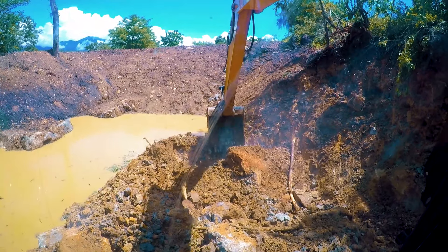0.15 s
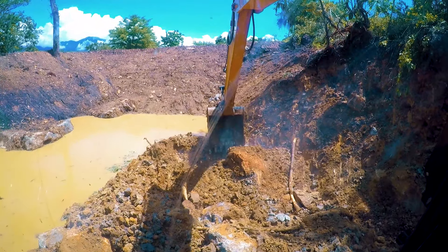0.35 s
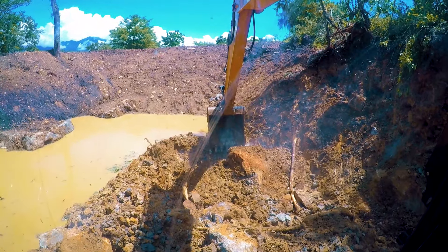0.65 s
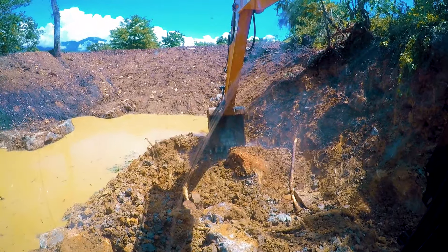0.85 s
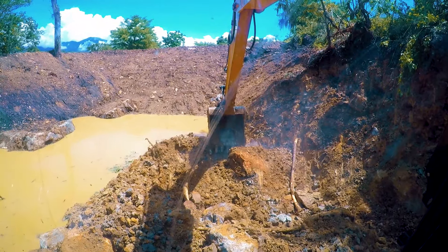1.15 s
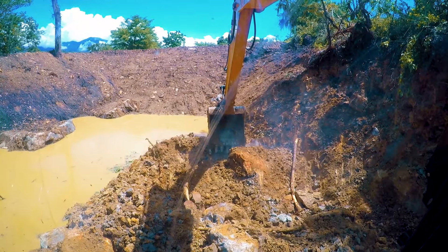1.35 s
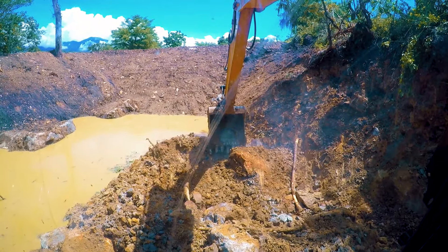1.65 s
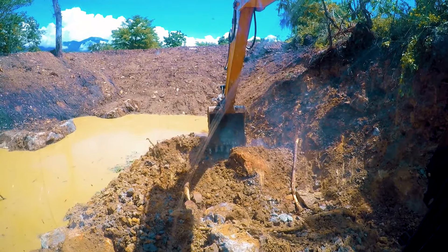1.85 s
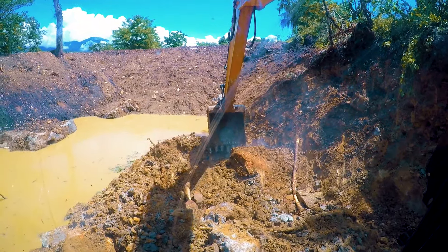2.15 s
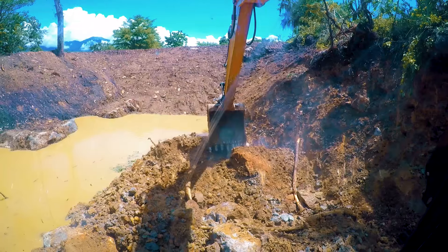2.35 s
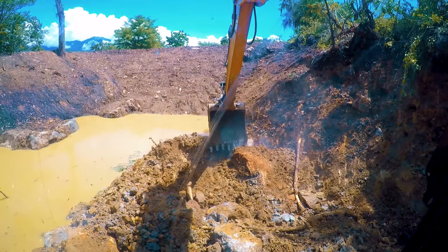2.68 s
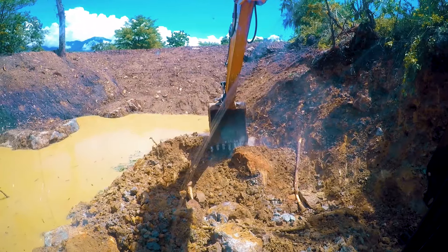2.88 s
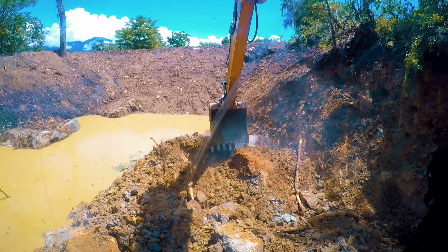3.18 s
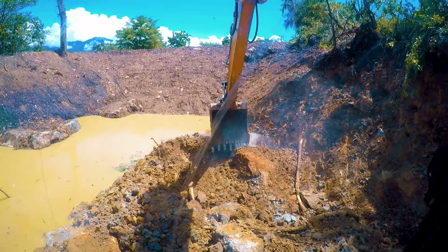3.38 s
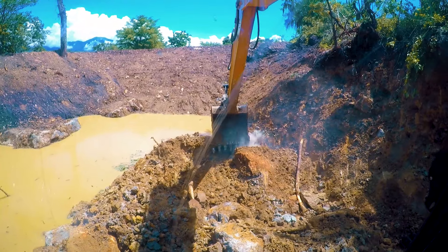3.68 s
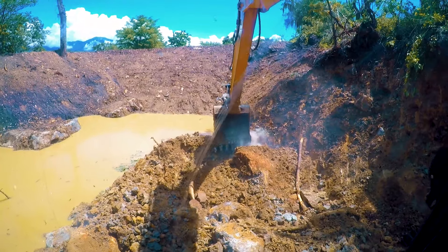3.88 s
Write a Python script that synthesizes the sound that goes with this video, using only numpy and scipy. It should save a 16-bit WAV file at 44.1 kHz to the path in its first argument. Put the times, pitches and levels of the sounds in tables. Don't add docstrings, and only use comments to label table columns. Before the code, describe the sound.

A small camera fixed to a digger's cab picks up close engine rumble, panel boom and pump whine through the frame. Stones snap brightly in the first third of a second, followed by irregular thuds, gritty grinding and occasional pebbles clicking. After three and a half seconds, two hard blows ring the bucket, the second strongest, while rubble cracks and pours. Open-air, dry, wide stereo with faint crackly ticks.

```python
import sys
import numpy as np
from scipy import signal
from scipy.fft import rfft, irfft, next_fast_len
from scipy.io import wavfile
from scipy.ndimage import uniform_filter1d, map_coordinates

SR = 44100
rng = np.random.default_rng(int(sys.argv[2]) if len(sys.argv) > 2 else 0)


def dump_mix(stems):
    frames = np.atleast_2d(stems).T
    limited = np.clip(frames, -1, 1)
    pcm = np.round(limited * 32767).astype(np.int16)
    wavfile.write(sys.argv[1], SR, pcm)


def makeup_ratio(level_db):
    decades = np.asarray(level_db, float) / 20
    return 10 ** decades


N = 177546
T = np.arange(N) / SR

# start_s, level_db, ring_centre_hz, t60_s
THUDS = [(.3, -36, 943, 0.2), (.318, -31.5, 1300, 0.097), (1.102, -24, 181.5, 0.13),
         (1.257, -44, 1095, 0.042), (1.93, -47.5, 906, 0.037), (2.189, -35, 1390, 0.072),
         (2.25, -30, 903, 0.085), (2.289, -31, 191, 0.074), (2.699, -33.5, 1410, 0.065),
         (2.791, -24.5, 249, 0.12), (3.042, -44, 448, 0.13), (3.075, -30, 455, 0.22),
         (3.101, -33.5, 270, 0.2), (3.458, -43.5, 1400, 0.4), (3.61, -12.5, 131.5, 0.1),
         (3.623, -30, 1320, 0.13), (3.677, -21, 328, 0.1), (3.711, -19.5, 278, 0.11),
         (3.814, -21.5, 324, .1), (3.681, -25.5, 1250, 0.14), (3.778, -13, 76, 0.36),
         (3.903, -34, 1280, 0.032)]
# start_s, level_db, ring_centre_hz, t60_s
BOULDER = [
    (3.596, -25, 240, .1),
    (3.612, -21, 300, .15),
    (3.632, -25, 400, .08),
    (3.735, -24, 1440, .09),
    (3.776, -8, 345, .09),
    (3.772, -21, 930, .1),
    (3.77, -20, 1400, .08),
    (3.785, -5, 165, .1),
]
# start_s, level_db, ring_centre_hz, t60_s
KNOCKS = [(.01, -26, 189.4, .12), (0.261, -36, 470, .1), (1.46, -41.5, 676, 0.11), (1.58, -25, 135, .15),
          (2.141, -27, 165, 0.2), (2.72, -30.5, 191, 0.13), (2.901, -30, 180.5, 0.19),
          (2.98, -22.5, 143.4, .15), (3.26, -28, 167, .15), (2.21, -31, 752, 0.13),
          (2.253, -42.5, 1410, 0.075), (2.71, -41, 805, 0.12), (2.82, -25, 187, 0.21),
          (3.06, -38, 1150, .15), (3.15, -26, 185, 0.22), (3.7, -28, 753, 0.11), (3.861, -22, 148, 0.2)]
# mode_hz, width_hz, level_db
ARM = [(76, 15, 0), (125, 20, -2), (150, 20, 0), (185, 20, -3), (235, 25, -3), (262, 25, -2), (300, 30, -4),
       (340, 30, -6), (455, 30, -6), (700, 50, -14), (880, 35, -10), (1150, 60, -19), (1270, 50, -18),
       (1440, 40, -14)]

# middle_s, length_s, level_db
JOLTS = [(.03, .08, -10), (.4, 0.078, -15), (1.15, .07, -11.5), (1.28, 0.13, -12), (1.47, 0.084, -17),
         (1.58, .06, -15.5), (1.9, .13, -10.5), (2.05, 0.068, -15), (2.26, 0.09, -11), (2.38, 0.06, -14.5),
         (2.66, 0.082, -11.5), (2.83, 0.094, -10), (3.06, 0.055, -13.5), (3.15, 0.079, -10.5),
         (3.32, .08, -17), (3.64, 0.08, -15.5), (3.78, .06, -14.5)]
# middle_s, length_s, level_db
LURCHES = [(.3, .14, -17.5), (.55, 0.18, -15), (.8, 0.064, -20.5), (1.15, 0.14, -16), (1.5, 0.077, -23),
           (1.72, 0.063, -16), (2.14, 0.072, -20.5), (2.5, 0.13, -17.5), (2.82, 0.052, -32),
           (3.15, 0.089, -32), (3.56, 0.36, -16), (3.9, .1, -33)]
# mode_hz, width_hz, level_db
CAB = [(76, 10, -11), (91.83, 9, -1), (102.03, 9, -1), (117.3, 8, -3.5), (129.4, 8, -8), (145, 9, -14.5)]
# freq_hz, density_db (per Hz)
SWAY = [(10, -39), (20, -5), (28, 4), (36, -1.5), (48, -22), (70, -11), (85, -33.5), (150, -120)]
BOOM_NOISE_DB = 1
SWELL_DB = 8.5
SWAY_REST_DB, DRAG_REST_DB, BOOM_REST_DB = -22, -47.5, -22

SHAFT_HZ = 29.33
# time_s, firing_db
LOAD = [(0, -29), (.25, -19.5), (.42, -31), (.7, -18), (.97, -12), (1.3, -28), (1.55, -16.5), (1.72, -14.5),
        (1.88, -17.5), (2.0, -20.5), (2.12, -16), (2.3, -26.5), (2.5, -22), (2.88, -23), (3.0, -17.5),
        (3.22, -26.5), (3.45, -18), (4.03, -33)]
# time_s, whine_db, brightness_db (per octave)
OIL_PRESSURE = [(0, -63, 1), (.3, -34, -0.5), (.65, -40, -0.5), (.8, -27.5, -2), (1.0, -26.5, -.5),
                (1.25, -27.5, 1), (1.55, -29.5, -0.5), (1.8, -29, .5), (2.2, -27.5, -1.5), (2.4, -44.5, 2),
                (2.55, -30.5, -1), (3, -31.5, -2), (3.25, -36.5, -5.5), (3.45, -51, 5), (4.03, -44.5, -2)]
PUMP_ORDERS = [9, 12, 27, 36, 45, 54, 63, 72, 81, 90]
# level_db, left_lead_rad, left_minus_right_db
PISTONS = [(-2.5, -2.9, -6), (-13, -1.1, 0), (-28, 2.1, -3), (-24.5, -.5, 1), (-28, 2.2, 0), (-25, 2.7, 0),
           (-39, .5, 0), (-43, 1, 0), (-44, 0, 0), (-51, 0, 0)]
# middle_s, length_s, level_db
VALVE = [
    (.45, 0.44, -67),
    (.8, .2, -69.5),
    (2.1, 0.35, -75),
]

# middle_s, length_s, drag_db
BITES = [(0, 0.12, -43), (0.384, 0.068, -51), (0.83, 0.27, -46), (1.118, 0.12, -39.5), (1.297, 0.11, -41.5),
         (1.574, 0.13, -45), (1.902, 0.19, -41), (2.258, 0.093, -38.5), (2.36, 0.097, -45),
         (2.655, 0.11, -43.5), (2.811, 0.094, -42), (3.054, 0.039, -42.5), (3.133, 0.082, -43),
         (3.534, 0.075, -39.5), (3.708, 0.15, -34), (3.787, 0.068, -29.5)]
# freq_hz, density_db (per Hz)
GROAN = [(120, -48), (160, 3.5), (182, -5), (225, -7), (290, -9.5), (350, -10), (400, -17), (520, -21.5),
         (620, -38.5), (900, -120)]
# freq_hz, density_db (per Hz)
SCRAPE = [(350, -120), (480, -6.5), (600, -0.5), (750, 6), (880, -8), (1000, 0), (1420, -3), (1600, -6.5),
          (1780, -17), (2600, -37.5), (5000, -120)]
GROAN_DB, GROAN_GROWS = -31, 0.76
# middle_s, length_s, level_db
GRINDS = [(1.93, 0.043, -44), (2.2, 0.026, -39.5), (2.26, 0.045, -39.5), (2.33, .04, -45),
          (2.56, 0.044, -46), (2.68, 0.079, -41), (2.82, .08, -42.5), (3.08, .07, -42), (3.17, .04, -49),
          (3.64, .05, -35.5), (3.7, .05, -31.5)]
# mode_hz, width_hz, level_db
LIP = [(706, 73, -3.5), (876, 76, -2), (1050, 120, -6), (1250, 77, -4.5), (1433, 60, -1)]

# start_s, crack_db, crunch_db
STONES = [(0.0545, -30, -36), (0.077, -48, -35), (0.15, -38.5, -33.5), (0.252, -43.5, -43),
          (0.273, -32.5, -35), (0.2754, -36, -39.5), (0.2863, -45, -40), (0.3, -44, -39.5),
          (0.314, -43.5, -39.5), (0.33, -55, -42.5), (.345, -60, -58), (0.5765, -37.5, -40),
          (0.5994, -44, -42.5), (1.098, -44, -49.5), (1.7491, -50.5, -50.5), (1.94, -46.5, -47),
          (2.265, -43.5, -44.5), (2.4888, -47, -42.5), (2.744, -38.5, -43), (2.967, -40, -45),
          (3.1412, -47, -45), (3.2755, -41.5, -44), (3.458, -58, -44.5), (3.511, -41, -43),
          (3.582, -43, -55), (3.592, -46, -34), (3.5985, -42.5, -33.5), (3.6608, -42, -43.5),
          (3.673, -48, -44.5), (3.7017, -48, -37.5), (3.7576, -27.5, -28.5), (3.7657, -33, -31),
          (3.8, -37.5, -45.5), (3.8445, -37.5, -43), (3.905, -45.5, -38.5), (3.9602, -35, -36),
          (4.003, -54, -36.5)]
# start_s, crack_db
PEBBLES = [(0.022, -36), (0.105, -48), (.4294, -52), (0.881, -44.5), (1.46, -50.5), (2.144, -47),
           (2.4313, -50), (2.547, -51.5), (2.67, -53), (2.8235, -56), (3.353, -51.5), (3.5707, -44.5),
           (3.649, -38.5), (3.9473, -37)]
# middle_s, length_s, over_rest_db
SPILLS = [
    (0.071, 0.15, 11.5),
    (3.7, 0.069, 18.5),
    (3.62, 0.034, 10.5),
    (3.84, 0.12, 18),
    (3.9, 0.034, 14.5),
]
# freq_hz, density_db (per Hz)
CRUNCH = [(200, -120), (350, 3.5), (800, 4.5), (1300, 1.5), (1750, -1.5), (2300, -2), (3100, -8.5),
          (3600, -8.5), (4800, -17), (6000, -34.5), (9000, -120)]
# freq_hz, density_db (per Hz)
CRACK = [(2500, -120), (4000, -13), (5200, -5.5), (6500, 1), (7400, 0.5), (8900, -12.5), (10500, -18),
         (11500, -28.5), (12500, -40.5), (16000, -66.5), (20000, -120)]
# freq_hz, density_db (per Hz)
SNAP = [(600, -120), (1200, -6.5), (3000, -5), (7000, 2), (10000, -6.5), (13500, -16), (15500, -30.5),
        (18000, -120)]
SNAP_DB, SNAP_T60_S = -7.5, 0.014
HOLD_S = 0.012
PEBBLE_CRUNCH_DB = -6
REBOUND_S, REBOUND_CRACK_DB, REBOUND_CRUNCH_DB = .022, -23.5, -12.5
HISS_DB, HISS_GROWS, RUSTLE_DB, RUSTLE_GROWS = -66, 0.74, -64, 0.8
SLIDE_S = 0.18
GRAIN_DB, GRAIN_BINS, GRAIN_FRAMES = 1.5, 3, 4
# start_s, end_s, pitch_hz, level_db
SQUEAKS = [
    (.34, .58, 5950, -67),
    (.42, .54, 8500, -78),
    (3.842, 3.885, 5350, -51),
    (3.6, 3.63, 2050, -45),
    (.076, .1, 2300, -45),
    (.074, .1, 3600, -48),
    (3.665, 3.69, 11900, -64),
    (1.93, 1.96, 2300, -61),
]
# start_s, level_db, t60_s
RINGS = [
    (3.76, -56, .3),
    (2.8, -72, 0.14),
    (3.5, -72, .15),
    (3.95, -60, 0.097),
]
# mode_hz, level_db
TOOTH = [(8250, -6), (8800, -5), (9300, -7), (9750, -2), (10300, -3), (10850, -7), (11500, -6)]

# freq_hz, likeness_0_to_1, left_lead_rad, left_minus_right_db
FRAME_PORTS = [(19.3, 0.4, 0.6, 2), (36.6, 0.1, 0.81, -5), (66.4, 0.8, 0.16, -15), (83.5, 1, 2.535, -1.5),
               (142.6, 0.95, 3.06, -4.5), (218.6, 0.79, 2.84, -4.5), (372, 0.07, 5.5, -0.5),
               (575, 0, 4.05, -3), (664, 0.65, 3.07, -2), (1560, 0.82, 2.8, 0), (1980, 1, 1.2, -4.5)]
# freq_hz, likeness_0_to_1, left_lead_rad, left_minus_right_db
ARM_PORTS = [(76, 0.2, 0.49, 4.5), (154, 1, 2.57, -7), (295, 0.72, 4.5, -3.5), (470, 0.98, 3.6, 4),
             (1510, 0.87, 2.87, -1)]
# freq_hz, likeness_0_to_1, left_lead_rad, left_minus_right_db
AIR_PORTS = [(400, 0.4, -3.5, -15), (1010, 0.2, 4, 0), (1700, 0, 0, 2), (2700, 0.8, 1.8, 0),
             (4330, 0.3, -0.85, -1), (5940, 0, 2.5, -1), (9350, 0.32, 4.5, -1), (13000, .5, 4.5, 1.5)]

BLOCKS_PER_S, BLOCK_START = 375, .2
# freq_hz, level_db
SEAM = [(1500, -28), (4000, -0.5), (7000, 6.5), (9000, 13), (11000, 3.5), (13000, 1), (15500, -6),
        (17000, -35)]
SEAM_DB, SEAM_GROWS = -59.5, 1.2
# start_s, level_db
TICKS = [(0.3533, -56), (.363, -61.5), (0.3818, -56), (.395, -59), (.8633, -60), (0.949, -54.5),
         (1.0766, -49.5), (1.2238, -60.5), (1.2579, -60.5), (1.2795, -56), (1.3537, -52), (1.3684, -55),
         (1.3744, -55.5), (1.511, -55.5), (1.573, -56.5), (1.731, -59), (1.7647, -56), (1.9891, -51),
         (2.0765, -51.5), (2.2586, -55), (2.3484, -56.5), (2.4382, -57.5), (2.6013, -56), (2.655, -55),
         (2.683, -59), (2.7166, -54.5), (2.8099, -58.5), (2.8336, -52), (3.037, -64), (3.0955, -56)]
TICK_DB = -7.5
# freq_hz, density_db (per Hz)
MIC_HISS = [(6000, -120), (9000, -4), (11000, 1), (12800, -1.5), (13200, -24.5), (15500, -33.5),
            (17000, -120)]
MIC_HISS_DB = -88.5


def unit(x):
    return x / np.sqrt(np.mean(x ** 2) + 1e-20)


def along(points, hz):
    f, *cols = np.transpose(points)
    return [np.interp(np.log(hz + 1), np.log(f + 1), c) for c in cols]


def curves(rows):
    s, *cols = np.transpose(rows)
    return [np.interp(T, s, c) for c in cols]


def wobble(rate):
    return map_coordinates(rng.standard_normal(int(N * rate / SR) + 4), [T * rate])


def two_wobbles(rate):
    return np.array([wobble(rate), wobble(rate)])


def filtered(x, response):
    m = next_fast_len(N + SR // 2)
    return irfft(rfft(x, m) * response(np.fft.rfftfreq(m, 1 / SR)), m)[..., :N]


def modes(table):
    def response(f):
        total = 0
        for k, (centre, width, db) in enumerate(table):
            damping = 1j * f * width
            total = total + (-1) ** k * makeup_ratio(db) * damping / (centre * centre - f * f + damping)
        return total
    return response


def rush(spectrum):
    return unit(filtered(rng.standard_normal((2, N)), lambda hz: makeup_ratio(along(spectrum, hz)[0])))


def steadied(x, span, share):
    power = np.abs(uniform_filter1d(x ** 2, int(span * SR), axis=-1)) + 0.0009
    return unit(x / power ** (share / 2))


def swells(rows, rest_db):
    power = makeup_ratio(2 * rest_db)
    for s, span, db in rows:
        fall_db = SWELL_DB * np.minimum(((T - s) / span) ** 2, 9)
        power = power + makeup_ratio(2 * (db - fall_db))
    return 10 * np.log10(power)


def bursts(rows, rise, hold=0):
    age = np.arange(SR // 2) / SR
    power = np.zeros(N + SR)
    for s, db, t60 in rows:
        decay_db = 60 * np.maximum(age - hold, 0) / np.clip(t60, .005, .33)
        burst = makeup_ratio(db - decay_db) * (1 - np.exp(-age / rise))
        power[round(s * SR):][:len(age)] += burst ** 2
    return np.sqrt(power[:N])


def ports(pair, table):
    def side(sign):
        def response(hz):
            alike, lead, db = along(table, hz)
            turn = np.arccos(np.clip(alike, 0, 1)) / 2
            shift = makeup_ratio(sign * db / 2) * np.exp(.5j * sign * lead)
            return shift * [np.cos(turn), sign * np.sin(turn)]
        return filtered(pair, response).sum(axis=0)
    return np.array([side(0.97), side(-0.94)])


def thuds():
    out = np.zeros((2, N + SR))
    age = np.arange(SR // 3) / SR
    hz = np.array(ARM)[:, :1]
    for s, db, centre_hz, t60 in THUDS + BOULDER + KNOCKS:
        near_db = -24 * np.log2(hz / centre_hz) ** 2 + rng.normal(0, 1.5, (2, len(ARM), 1))
        phase = rng.random((2, len(ARM), 1))
        rings = makeup_ratio(near_db) * np.sin(2 * np.pi * (hz * age + phase))
        envelope = makeup_ratio(db - 60 * age / t60) * (1 - np.exp(-age / 0.0021))
        out[:, round(s * SR):][:, :len(age)] += envelope * rings.sum(axis=1)
    return out[:, :N]


def cab():
    sway_db = swells(LURCHES, SWAY_REST_DB)
    boom_db = swells(JOLTS, BOOM_REST_DB)
    sway = steadied(rush(SWAY), span=0.18, share=0.94)
    rattle = unit(filtered(rng.standard_normal((2, N)), lambda hz: modes(CAB)(hz) ** 2))
    rattle = steadied(rattle, span=0.036, share=0.77)
    boom = unit(panels() + makeup_ratio(BOOM_NOISE_DB) * rattle)
    return makeup_ratio(sway_db) * sway + makeup_ratio(boom_db) * boom


def panels():
    hum = np.zeros((2, N))
    for hz, width, db in CAB:
        level = makeup_ratio(db + 1.6 * two_wobbles(width))
        hum += level * np.sin(2 * np.pi * hz * T + 1.5 * two_wobbles(width))
    return unit(hum)


def engine():
    turns = 2 * np.pi * np.cumsum(SHAFT_HZ * (1 + .002 * wobble(2))) / SR
    sides = np.array([[.5], [-.5]])
    firing_level = makeup_ratio(curves(LOAD)[0] + 0.5 + 1 * sides)
    firing = firing_level * np.sin(2 * turns + 0.75 * sides + .5 * wobble(4.84))
    oil_db, bright_db = curves(OIL_PRESSURE)
    whine = np.zeros((2, N))
    for k, (db, lead, lr_db) in zip(PUMP_ORDERS, PISTONS):
        level_db = db + bright_db * np.log2(k / 9) + lr_db * sides + 9 / k ** .7 * wobble(7)
        waver = (8 / k + .015 * np.sqrt(k)) * wobble(10)
        whine += makeup_ratio(level_db) * np.sin(k * turns + lead * sides + waver)
    valve = makeup_ratio(swells(VALVE, -80) + 1.5 * wobble(8)) * np.sin(45 * turns + .4 * wobble(10))
    return firing + makeup_ratio(oil_db) * whine + valve


def drag():
    return swells(BITES, DRAG_REST_DB) - DRAG_REST_DB


def digging():
    groan_db = GROAN_DB + GROAN_GROWS * drag()
    scrape_db = DRAG_REST_DB + drag()
    slips = 2 * wobble(24.815) + 1.7 * wobble(70)
    groan = makeup_ratio(groan_db - 3.5 + 0.55 * slips) * steadied(rush(GROAN), span=0.072, share=0.21)
    steel = unit(filtered(rush(SCRAPE), lambda hz: 1 + 5 * modes(ARM)(hz)))
    return groan + makeup_ratio(scrape_db - 3.5 + slips) * steel


def grinds():
    rub = unit(filtered(rng.standard_normal((2, N)), modes(LIP)))
    return makeup_ratio(swells(GRINDS, -69) + 2.7 * wobble(60)) * rub


def stones():
    slide_db = uniform_filter1d(drag(), int(SLIDE_S * SR))
    slide_db = 10 * np.log10(makeup_ratio(2 * slide_db) + makeup_ratio(2 * swells(SPILLS, -22.0)))
    hiss_db = HISS_DB + HISS_GROWS * slide_db
    rustle_db = RUSTLE_DB + RUSTLE_GROWS * slide_db

    rebounds = [(s + REBOUND_S, a + REBOUND_CRACK_DB, b + REBOUND_CRUNCH_DB) for s, a, b in STONES]
    pebbles = [(s, db, db + PEBBLE_CRUNCH_DB) for s, db in PEBBLES]
    falls = STONES + rebounds + pebbles

    def lasts(db):
        return 0.1 + 0.00079 * (db + 42.5)

    crack = bursts([(s, db - 8, lasts(db)) for s, db, _ in falls], rise=.0005, hold=HOLD_S)
    snap = bursts([(s, db + SNAP_DB, SNAP_T60_S) for s, db, _ in falls], rise=.0002)
    crunch = bursts([(s, db - 2, 1.05 * lasts(db)) for s, _, db in falls], rise=0.00094, hold=HOLD_S)
    pieces = makeup_ratio(1.4 * wobble(300) + .8 * wobble(70))
    patches = .7 * wobble(12) + 1 * wobble(40)
    bright = np.hypot(pieces * crack, makeup_ratio(hiss_db + 1.0 + patches)) * rush(CRACK)
    dull = np.hypot(pieces * crunch, makeup_ratio(rustle_db + 7.0 + patches)) * rush(CRUNCH)
    return patchy(bright + dull, GRAIN_DB) + snap * rush(SNAP)


def patchy(x, depth_db):
    z = signal.stft(x, nperseg=256)[2]
    field = rng.standard_normal(z.shape[1:])
    field = uniform_filter1d(field, GRAIN_BINS, 0)
    field = uniform_filter1d(field, GRAIN_FRAMES, 1)
    gain = makeup_ratio(depth_db * unit(field))
    return signal.istft(z * unit(gain), nperseg=256)[1][:, :N]


def squeaks():
    out = np.zeros((2, N))
    for start, end, hz, db in SQUEAKS:
        gate = np.clip(np.minimum(T - start, end - T) / 0.0026, 0, 1)
        waver = 2.2 * two_wobbles(hz / 30)
        out += makeup_ratio(db + 1.2 * wobble(40)) * gate * np.sin(2 * np.pi * hz * T + waver)
    return out


def tooth():
    ring = np.zeros((2, N))
    for hz, db in TOOTH:
        ring += makeup_ratio(db + 3.0 * wobble(30)) * np.sin(2 * np.pi * hz * T + two_wobbles(40))
    return bursts(RINGS, rise=0.00102) * ring


def seams(x):
    block = np.arange(int(N / SR * BLOCKS_PER_S)) + BLOCK_START
    at = np.round(block / BLOCKS_PER_S * SR).astype(int)
    shake = uniform_filter1d(np.abs(x[0] - x[1]), size=900)[at]
    sizes = rng.standard_normal((2, len(at))) * rng.random((2, len(at))) ** 2.5
    jumps = np.zeros((2, N))
    jumps[:, at] = unit(shake ** SEAM_GROWS * sizes)
    for s, db in TICKS:
        jumps[:, round(s * SR)] = makeup_ratio(db + TICK_DB - SEAM_DB + 18) * rng.uniform(.3, 1, size=2)
    return filtered(makeup_ratio(SEAM_DB) * jumps, lambda hz: makeup_ratio(along(SEAM, hz)[0]))


def mic_hiss():
    return makeup_ratio(MIC_HISS_DB + 2 * wobble(14)) * rush(MIC_HISS)


def scene():
    arm = ports(thuds() + grinds(), ARM_PORTS)
    frame = engine() + ports(cab() + digging(), FRAME_PORTS)
    air = ports(stones() + squeaks() + tooth(), AIR_PORTS)
    return arm + frame + air


def roll_off(x):
    return signal.sosfilt(signal.butter(12, 15800, fs=SR, output="sos"), x)


def record(dry):
    ceiling = (1 + np.abs(dry / .95) ** 6) ** (1 / 6)
    mix = (dry + mic_hiss() + seams(dry)) / ceiling
    return roll_off(mix)


dry = scene()
out = record(dry)
dump_mix(out)
```